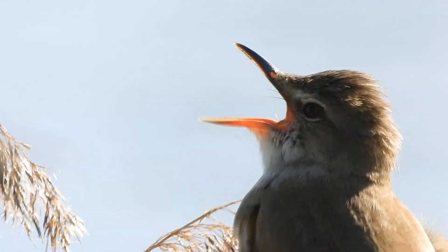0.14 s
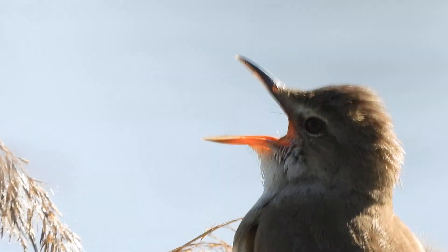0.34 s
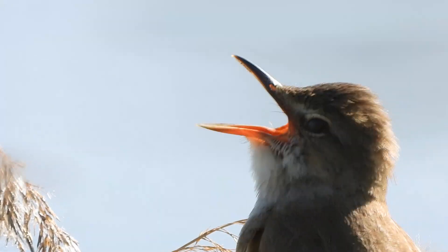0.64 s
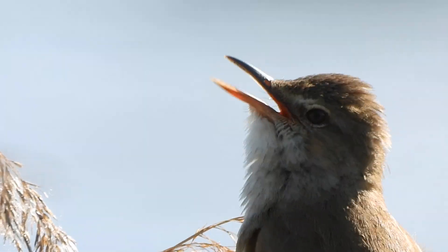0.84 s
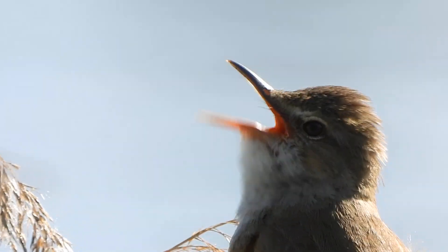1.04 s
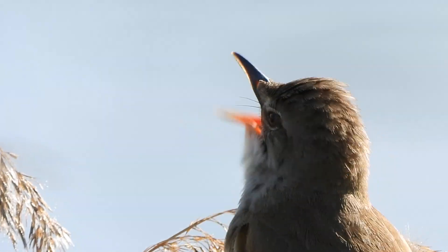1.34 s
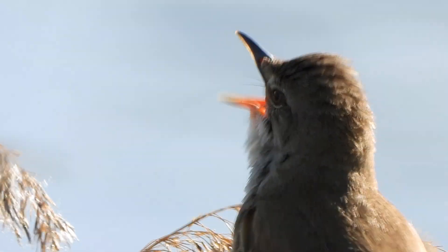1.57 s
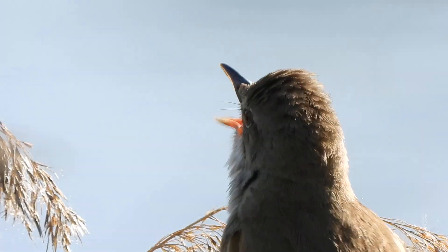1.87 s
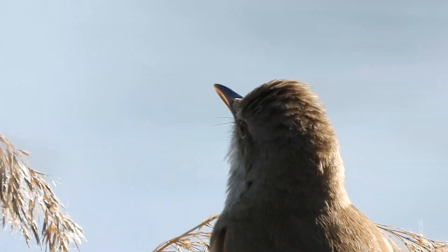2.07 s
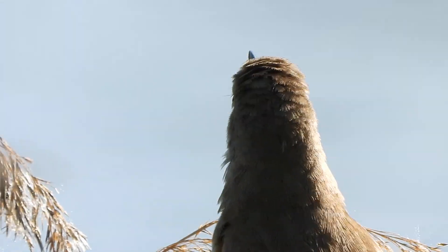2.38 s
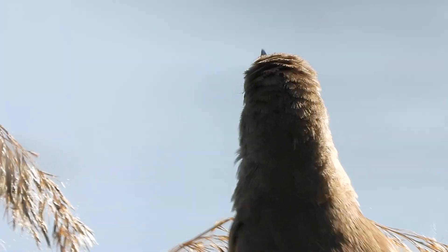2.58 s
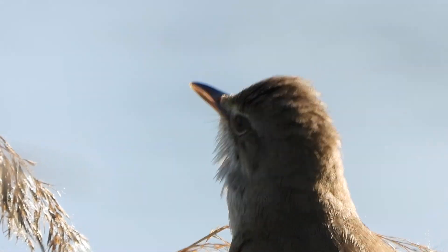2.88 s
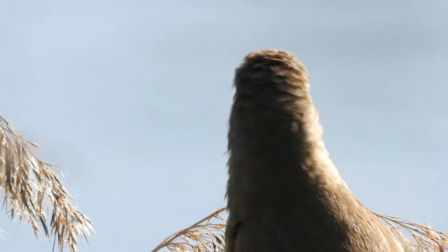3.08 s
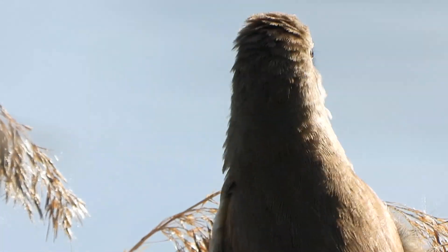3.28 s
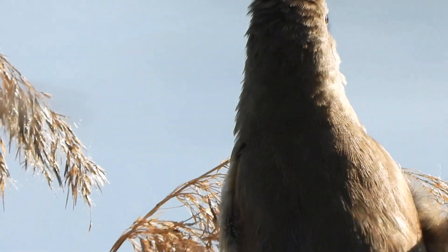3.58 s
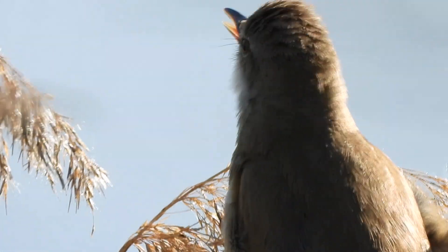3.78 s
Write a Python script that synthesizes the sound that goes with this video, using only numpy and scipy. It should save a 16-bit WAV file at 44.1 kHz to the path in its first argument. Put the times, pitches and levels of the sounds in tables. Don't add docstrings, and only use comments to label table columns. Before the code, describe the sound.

Close outdoor bird song, slightly hollow and ringing: two tic-and-whistle pairs, a run of buzzy double-arched rasps, then froglike croaks in pairs to the end; faint wind, a few water drops and dry stem ticks behind.

```python
import sys
import numpy as np
from scipy import signal
from scipy.fft import rfft, irfft, next_fast_len
from scipy.io import wavfile
from scipy.ndimage import uniform_filter1d

SR = 44100
rng = np.random.default_rng(int(sys.argv[2]) if len(sys.argv) > 2 else 0)


def put_to_file(sound):
    columns = np.atleast_2d(sound).T
    safe = np.clip(columns, -1, 1)
    whole_steps = np.round(safe * 32767)
    wavfile.write(sys.argv[1], SR, whole_steps.astype(np.int16))


def field_ratio(decibels):
    return 10 ** (np.asarray(decibels, dtype=float) / 20)


N = 172872


def evened(x):
    return x / np.sqrt(np.mean(x ** 2) + 1e-20)


def read(points, hz):
    f, value = np.transpose(points)
    return np.interp(np.log(hz + 1), np.log(f + 1), value)


def add(mix, s, sound):
    part = mix[round(s * SR):][:len(sound)]
    part += sound[:len(part)]


def shaped(x, db):
    size = next_fast_len(x.shape[-1] + 512)
    gain = field_ratio(db(np.fft.rfftfreq(size, 1 / SR)))
    return irfft(rfft(x, size) * gain, size)[..., :x.shape[-1]]


def chance(n, hz):
    settle = 900
    poles = [1, -2 * np.exp(-6 * hz / SR), np.exp(-12 * hz / SR)]
    return evened(signal.lfilter([1], poles, rng.standard_normal(n + settle))[settle:])


def ring(x, hz, width):
    r = np.exp(-np.pi * width / SR)
    return 2 * signal.lfilter([1 - r], [1, -r * np.exp(2j * np.pi * hz / SR)], x).real


# f/Hz, level/dB per Hz
WASH_COLOUR = [(40, -59.5), (190, -32.5), (330, -9.5), (560, -7.5), (900, -0.5), (1500, -4.5),
               (2690, -17.5), (3630, -24), (4480, -21), (10000, -41), (11800, -60.5), (16000, -93.5)]
# f/Hz, level/dB per Hz
RUMBLE_COLOUR = [(30, -63), (60, -49), (119, -23.5), (170, -6), (208, 4.5), (250, -5), (330, -21.5),
                 (500, -47)]
# t/s, rumble level/dB, wash level/dB
GUSTS = [(0.0, -41, -33.5), (0.09, -37, -34), (0.3, -39.5, -34.5), (0.508, -37, -36.5), (0.9, -41, -36),
         (1.2, -43.5, -36), (1.31, -38.5, -38), (1.8, -44, -38.5), (2.05, -41, -36.5), (2.3, -43.5, -36.5),
         (2.7, -44, -36), (3.1, -46, -38), (3.5, -45.5, -37.5), (3.899, -46.5, -39.5), (3.92, -42, -31)]
# f/Hz, left-right likeness (clipped to -1..1)
PORT_LIKENESS = [(60, 4.57), (220, 0.8643), (830, 0.9214), (3070, 0.41), (11400, -0.5047)]


def wind():
    frames, hz = N // 256 + 5, np.fft.rfftfreq(1024, 1 / SR)
    a, b, c, d, patches = rng.standard_normal((frames, 513, 5)).T
    patches = evened(uniform_filter1d(uniform_filter1d(patches, 5, 0), 10, 1))
    same = np.clip(read(PORT_LIKENESS, hz), -1, 1)[:, None]
    left = a + 1j * b
    right = same * left + np.sqrt(1 - same ** 2) * (c + 1j * d)
    spectra = np.array([left, right]) * field_ratio(3.598 * patches)
    noise = signal.istft(spectra, nperseg=1024, noverlap=768)[1][:, :N]
    low = evened(shaped(noise, lambda f: read(RUMBLE_COLOUR, f)))
    high = evened(shaped(noise, lambda f: read(WASH_COLOUR, f)))
    t = np.arange(N) / SR
    s, rumble_db, wash_db = np.transpose(GUSTS)
    return field_ratio(np.interp(t, s, rumble_db) - 0.67) * low + field_ratio(np.interp(t, s, wash_db) + 2.0) * high


# start t/s, length/s, from f/Hz, to f/Hz, level/dB
DISTANT_NOTES = [
    (2.321, 0.053, 3403, 3704, -41),
    (2.452, 0.048, 4110, 4120, -46),
    (2.487, .028, 4160, 4700, -46),
]


def far_note(start, length, from_hz, to_hz, db):
    u = np.arange(0, length, 1 / SR) / length
    hz = (from_hz + (to_hz - from_hz) * u) * (1 + .006 * chance(len(u), 150))
    return start, field_ratio(db) * np.sin(np.pi * u) ** .5 * np.cos(2 * np.pi * np.cumsum(hz) / SR)


# t/s, peak level/dB, f/Hz
WATER_DROPS = [
    (1.214, -32, 906),
    (1.404, -25.5, 1030),
    (1.477, -24.5, 989),
    (1.517, -27, 1091),
    (2.477, -20.5, 972.6),
]


def drips():
    out, t = np.zeros(N), np.arange(500) / SR
    for s, db, hz in WATER_DROPS:
        loud = field_ratio(db + 1.5 - 60 * t / 0.023) * np.minimum(t / 0.00037, 1)
        add(out, s, loud * np.sin(2 * np.pi * hz * t * (1 + 12 * t)))
    return out


# t/s, peak level/dB
STEM_TICKS = [
    (3.219, -48),
    (3.2856, -23.5),
    (3.29, -26),
    (3.64, -45),
    (3.8685, -42),
]
# f/Hz, level/dB, t60/s
STEM_MODES = [(4552, 0.5, 0.009), (6595, 0, 0.0036), (10500, -17.5, .003)]


def stems():
    out, t = np.zeros(N), np.arange(600) / SR
    for s, db in STEM_TICKS:
        for hz, mode_db, t60 in STEM_MODES:
            loud = field_ratio(db + mode_db - 3 - 60 * t / t60) * np.minimum(t / .0004, 1)
            add(out, s, loud * np.sin(2 * np.pi * hz * rng.normal(1, 0.044) * t))
    return out * field_ratio(np.array([[1.5], [-2.5]]))


def reeds(x):
    near_db, near_t60_s, bed_db, bed_t60_s = -6, 0.0805, -16, 0.785
    t = np.arange(SR // 2) / SR
    taps = rng.standard_normal((2, 2, len(t))) * (rng.random((2, 2, len(t))) < .06) * (t > .004)
    near = taps[0] * field_ratio(-60 * t / near_t60_s)
    bed = taps[1] * field_ratio(-60 * t / bed_t60_s)
    tail = field_ratio(near_db) * near / np.linalg.norm(near[0]) + field_ratio(bed_db) * bed / np.linalg.norm(bed[0])
    tail = shaped(tail, lambda f: np.clip(5.5 * np.log2((f + 1) / 4200), -12, 3))
    return signal.fftconvolve(x[None], tail, axes=1)[:, :N]


# f/Hz, width/Hz, left level/dB, right level/dB
HOUSING_MODES = [(1749.3, 34.2, 8, 6.5), (1900.6, 50, -5, 2), (2055.6, 41.7, 7.5, -1), (2218.9, 85.4, 4, 3),
                 (2456, 34, 1, 5.5), (2836, 113.3, 3, -4), (3000, 49.9, 6, 2.5), (3175, 110.6, 1.5, 1),
                 (3434, 18, -7.5, -3.5), (3528.5, 120, 1.5, 0.5), (3795, 40, -12.5, -1.5),
                 (4053, 27, -1.5, -4.5), (4322, 56, -7, -2), (4483.5, 100, -8, -8)]


def housing(x):
    direct = field_ratio(-6) * (x - 0.734 * ring(x, hz=2395, width=1270))
    out = np.array([np.roll(direct[0], 2), direct[1]])
    for hz, width, left_db, right_db in HOUSING_MODES:
        out = out + field_ratio(np.array([[left_db], [right_db]]) - 1.5) * ring(x, hz, width)
    return out


# f/Hz, level/dB per Hz
BREATH_COLOUR = [(500, -43), (2300, -36.5), (3000, 3.5), (4500, 4), (7000, -15.5), (16000, -47.5)]
# f/Hz, level/dB per Hz
HISS_COLOUR = [(3000, -29.5), (7000, -9), (10500, -3.5), (11800, -22), (13000, -29.5), (16000, -49.5)]


def syrinx(hz, beak_hz, rough, beak_width_hz, skirt_db, air_db, hiss_db, flutter_hz, jitter, low_db):
    n, rough = len(hz), np.clip(rough, 0, 1)
    turns = np.cumsum(hz * (1 + jitter * rough * np.tanh(chance(n, 500)))) / SR
    k = np.arange(1, 11)[:, None]
    off = (k * hz - beak_hz) / beak_width_hz
    peak = 1 / (1 + off ** 4 * np.where(off < 0, 6, 1))
    skirt = np.where(off > 0, field_ratio(skirt_db * k), field_ratio(low_db) * (k > 1))
    shaky = 1 + .6 * (.2 + .6 * rough) * np.tanh([chance(n, 200) for _ in k])
    tone = evened(((peak + skirt) * shaky * np.cos(2 * np.pi * k * turns + k ** 2)).sum(0))
    flutter = np.cos(2 * np.pi * np.cumsum(flutter_hz * (1 + .15 * chance(n, 80))) / SR)
    air = evened(shaped(rng.standard_normal(n), lambda f: read(BREATH_COLOUR, f * 3600 / np.mean(beak_hz))))
    hiss = evened(shaped(rng.standard_normal(n), lambda f: read(HISS_COLOUR, f)))
    pulsed = (1 + rough * flutter) / np.sqrt(1 + rough ** 2 / 2)
    return (tone + field_ratio(air_db) * (0.4 + rough) * air) * pulsed + field_ratio(hiss_db) * hiss


def arch(u, start, top, fall):
    climb = 1 - (1 - start) * (1 - u / top) ** 2
    drop = 1 - (1 - fall) * ((u - top) / (1 - top)) ** 2
    return np.where(u < top, climb, drop)


# start t/s, level/dB
TIC_CALLS = [
    (0.124, -23),
    (0.378, -21.5),
]


def tic(start, db):
    from_hz, to_hz, broken_hz = 1400, 1891.5, 2803
    rise_s, end_s = 0.013, 0.035
    u = np.arange(0, rise_s + end_s, 1 / SR) / rise_s
    hz = np.where(u < 1, from_hz + (to_hz - from_hz) * u, broken_hz)
    loud = np.where(u < 1, u ** 1.8, np.exp(-2.5 * (u - 1)))
    voice = syrinx(hz, beak_hz=5140, rough=0.43 + 0 * u, beak_width_hz=1700, skirt_db=-7.5, air_db=-13.5,
                   hiss_db=-23.0, flutter_hz=430, jitter=0.024, low_db=-9)
    return start, field_ratio(db + 1.5) * loud * voice


# t/s, f/Hz, level/dB
WHISTLE_CALLS = [
    [(0.185, 1534, -47), (0.193, 1475, -30.5), (0.205, 1484, -27), (0.289, 1517, -20.5),
     (0.313, 1556, -21.5), (0.335, 1485, -42)],
    [(0.44, 1442, -31.5), (0.458, 1521, -26.5), (0.482, 1510, -23.5), (0.552, 1496, -20),
     (0.566, 1463, -25.5), (0.578, 1630, -55), (0.585, 1520, -45)],
]
# multiple of the pitch, level/dB
WHISTLE_PARTIALS = [(1, -4), (2, -8), (3, 1.5), (4, 0.5), (5, -15), (6, -20.5), (7, -18), (8, -35),
                    (9, -35)]


def whistle(rows):
    s, hz, db = np.transpose(rows)
    t = np.arange(s[0], s[-1], 1 / SR)
    pitch = uniform_filter1d(np.interp(t, s, hz), 200)
    turns = np.cumsum(pitch * (1 + .0018 * chance(len(t), 100))) / SR
    tone = np.zeros(len(t))
    for k, partial_db in WHISTLE_PARTIALS:
        tone += field_ratio(partial_db + 1.5 * chance(len(t), 38.0)) * np.cos(2 * np.pi * k * turns)
    air = evened(shaped(rng.standard_normal(len(t)), lambda f: read(BREATH_COLOUR, f)))
    puff = 1 + 1.6 * np.exp(-((s[-1] - .018 - t) / 0.0055) ** 2)
    edge = np.clip(np.minimum(t - s[0], s[-1] - t) / 0.0038, 0, 1)
    loud = edge * field_ratio(np.interp(t, s, db) - 1.5)
    return s[0], loud * (evened(tone) + field_ratio(-20) * air * puff)


# start t/s, first top after/s, second arch after/s, level/dB, second arch level/dB
RASP_CALLS = [(0.745, 0.0278, 0.039, -16, -1.5), (.856, 0.0188, 0.0374, -15.5, -2),
              (1.027, 0.0197, 0.0382, -15.5, 0.5), (1.14, 0.02416, 0.04355, -15, -1),
              (1.324, 0.0299, 0.0403, -15.5, -0.5), (1.446, 0.01516, .04, -18.5, -4),
              (1.621, .021, .043, -18, -1), (1.74, 0.01574, 0.0393, -17, -2.5),
              (1.917, 0.0246, 0.0464, -16, -4.5), (2.047, 0.02056, 0.04014, -18, -4)]


def rasp(start, top_s, split_s, db, second_db):
    first_hz, second_hz, second_s = 1071.9, 1096.6, .023
    shut_hz, open_hz = 3227, 4392
    shut_low_db, open_low_db = -27, -15.5
    t = np.arange(0, split_s + second_s, 1 / SR)
    second = t > split_s
    u = np.where(second, (t - split_s) / second_s, t / split_s)
    top = np.where(second, .35, np.clip(top_s / split_s, .2, .8))
    hz = np.where(second, second_hz, first_hz) * arch(u, 0.939, top, 0.8) * rng.normal(1, 0.00799)
    opened = np.clip((t - top_s) / (split_s + 0.0053 - top_s), 0, 1)
    beak_hz = shut_hz + (open_hz - shut_hz) * opened - 500 * second * u ** 2
    rough = np.where(second, .12, .42) + .55 * np.clip((u - top) / .15, 0, 1)
    swell_db = np.where(u < top, -11 * (1 - u / top) ** 2, -7 * ((u - top) / (1 - top)) ** 2)
    edge = np.clip(np.minimum(t, t[-1] - t) / 0.0025, 0, 1)
    loud = edge * field_ratio(swell_db + second_db * second - 1.69 * rough)
    low_db = shut_low_db + (open_low_db - shut_low_db) * np.sqrt(opened)
    voice = syrinx(hz, beak_hz, rough, beak_width_hz=760, skirt_db=-7, air_db=-6, hiss_db=-20.0,
                   flutter_hz=330, jitter=0.0326, low_db=low_db)
    unsteady = field_ratio(db + 3.57 * np.tanh(chance(len(t), 130)))
    return start, unsteady * uniform_filter1d(loud, 60) * voice


# top t/s, rise/s, fall/s, level/dB, second harmonic f/Hz
CROAK_CALLS = [(2.363, 0.0338, .022, -18.5, 2250), (2.42, 0.0321, .022, -17.5, 2199),
               (2.551, 0.03666, .02, -15.5, 2245), (2.607, 0.031, .026, -18.5, 2203),
               (2.731, 0.0347, .026, -15, 2247), (2.788, .028, .026, -16.5, 2222),
               (2.929, 0.0308, .021, -16, 2261), (2.99, 0.0375, .022, -15, 2251),
               (3.122, 0.03437, .022, -16, 2262), (3.183, 0.0302, .026, -16, 2258),
               (3.339, .036, .024, -15, 2314), (3.403, 0.0359, .022, -17.5, 2248),
               (3.552, 0.0315, .026, -15.5, 2317), (3.617, 0.0339, .022, -18.5, 2264),
               (3.775, 0.02973, .026, -16.5, 2267), (3.84, 0.03135, .022, -16, 2236)]


def croak(top_s, rise, fall, db, top_hz):
    rise, fall = 1.3 * rise, 1.1 * fall
    u = np.arange(0, rise + fall, 1 / SR) / (rise + fall)
    top = rise / (rise + fall)
    share = arch(u, 0.7, top, 0.66)
    rough = .2 + np.where(u < top, 3.5, 7) * (1 - share)
    sag_db = np.where(u < top, -75, -38) * (1 - share)
    edge = np.clip(np.minimum(u, 1 - u) / 0.04, 0, 1)
    loud = edge * field_ratio(sag_db) * np.tanh(1.239 + chance(len(u), 110))
    voice = syrinx(top_hz / 2 * share, 2330.3 - 1500 * (1 - share), rough, beak_width_hz=482, skirt_db=-9.0,
                   air_db=-18.5, hiss_db=-33.0, flutter_hz=228.75, jitter=0.029, low_db=-39)
    return top_s - rise - .001, field_ratio(db - 0.5) * loud * voice


def scene():
    bird = np.zeros(N)
    calls = ((far_note, DISTANT_NOTES), (tic, TIC_CALLS), (rasp, RASP_CALLS), (croak, CROAK_CALLS))
    for note, rows in calls:
        for row in rows:
            add(bird, *note(*row))
    for rows in WHISTLE_CALLS:
        add(bird, *whistle(rows))
    breeze = wind()
    through_body = housing(bird + reeds(bird) + 0.2865 * breeze)
    return through_body + 0.901 * breeze + stems() + drips()


def band_limit(x):
    return signal.sosfilt(signal.butter(12, 15000, fs=SR, output="sos"), x)


# f/Hz, left minus right level/dB
PORT_LEAN = [(60, -0.5), (170, -0.62), (490, 0.5), (1400, -1.9), (3990, -2.5), (11400, -3.8)]


def record(dry):
    ports = shaped(dry, lambda f: read(PORT_LEAN, f) * np.array([[.5], [-.5]]))
    limited = 0.861 * np.tanh(ports / 0.833)
    return band_limit(limited)


dry = scene()
out = record(dry)
put_to_file(out)
```